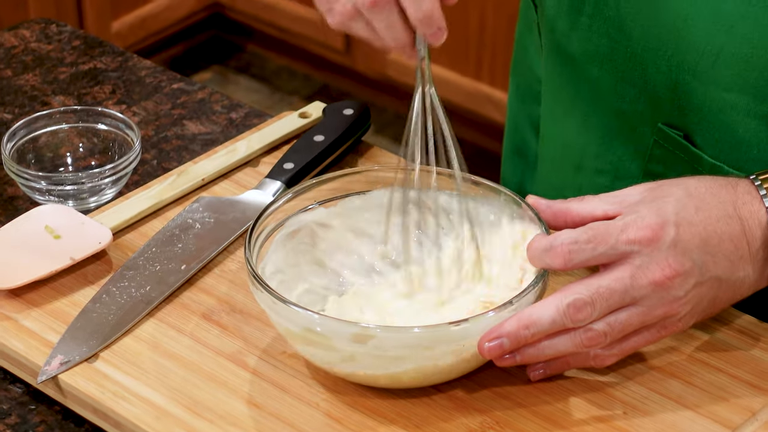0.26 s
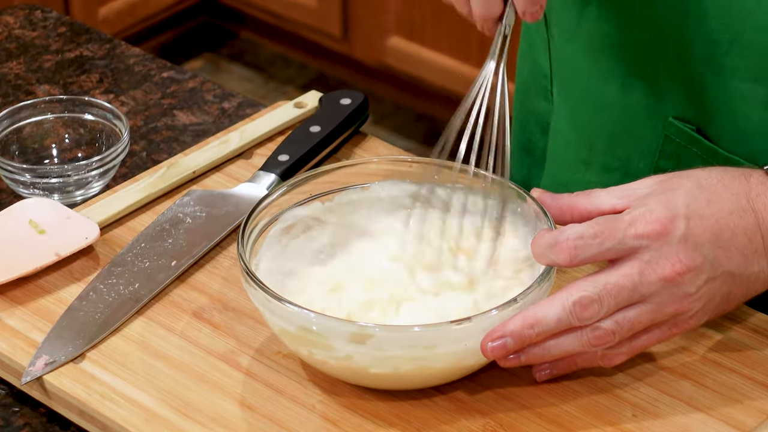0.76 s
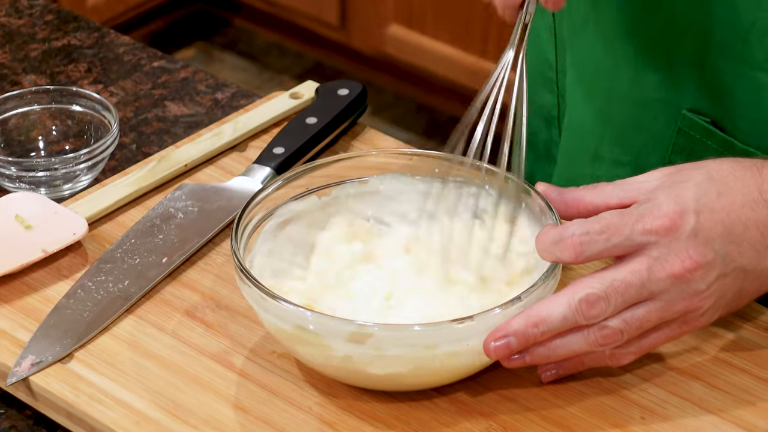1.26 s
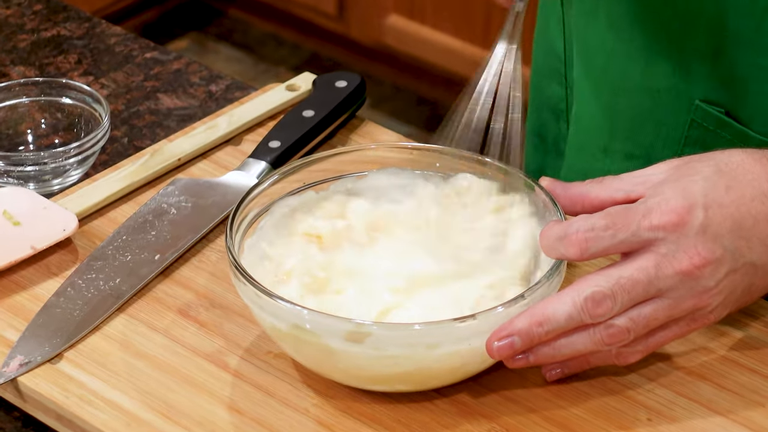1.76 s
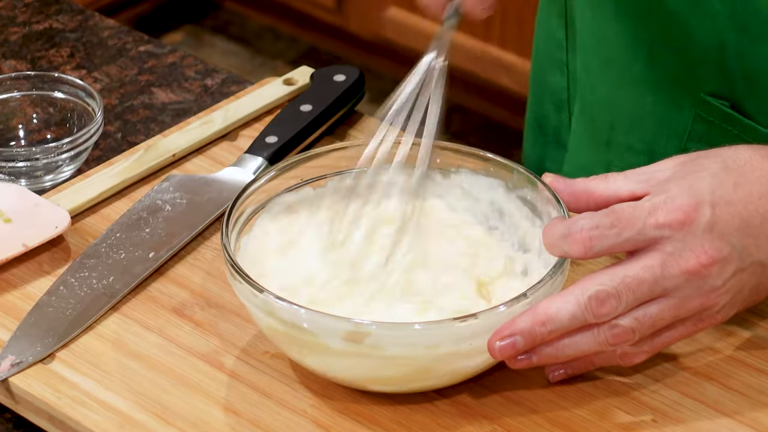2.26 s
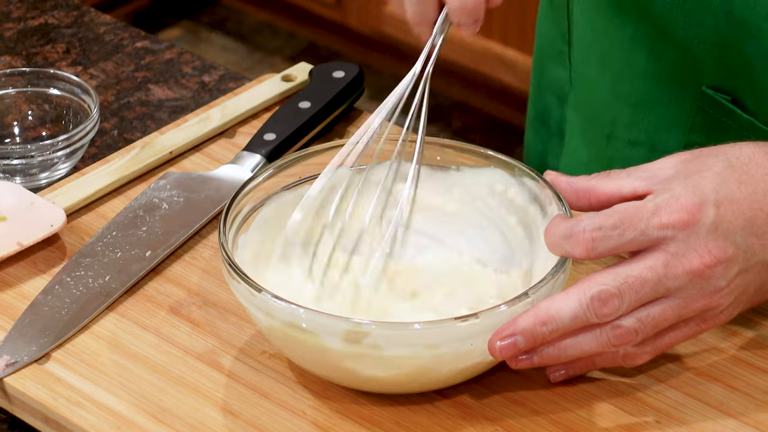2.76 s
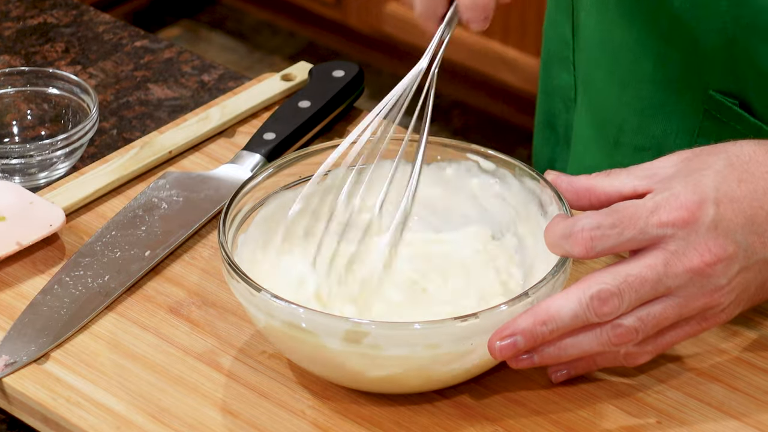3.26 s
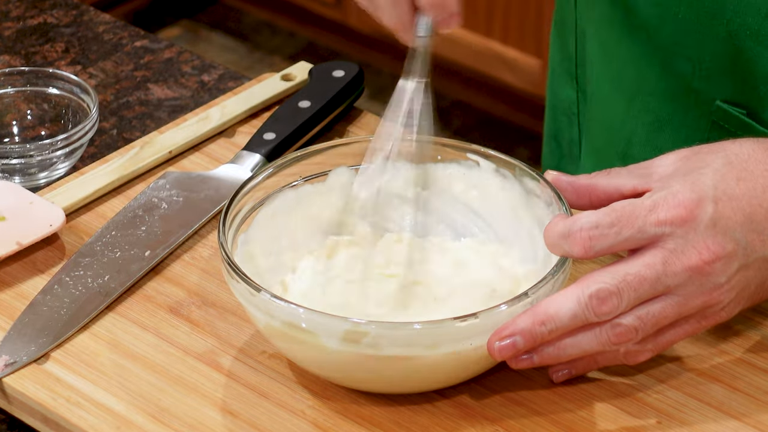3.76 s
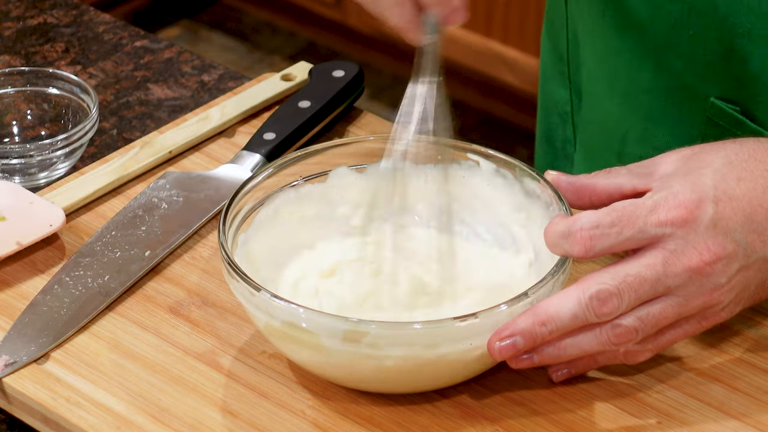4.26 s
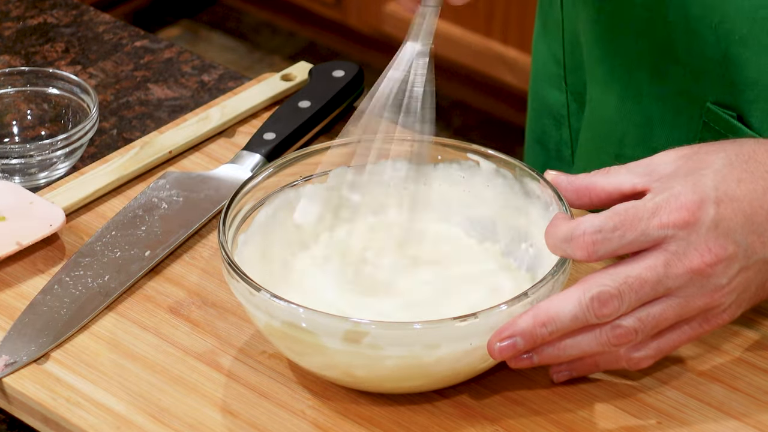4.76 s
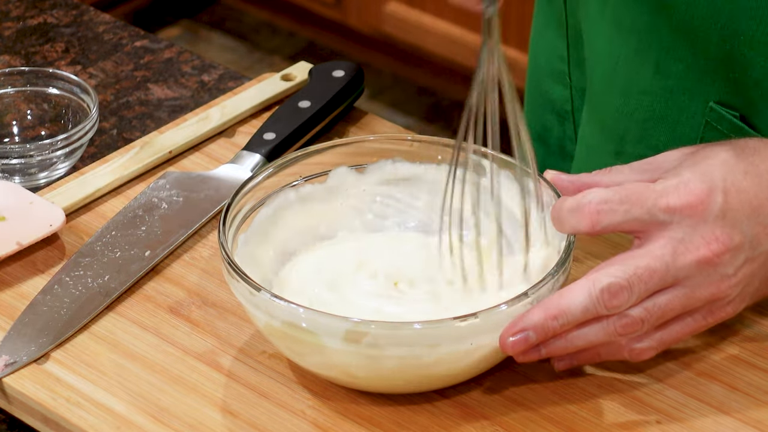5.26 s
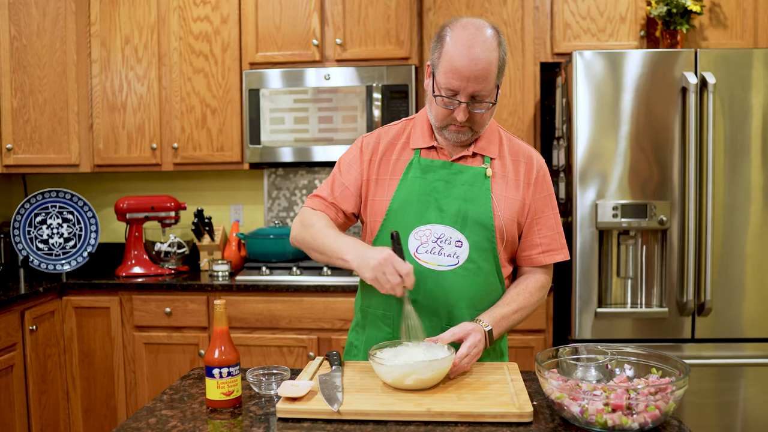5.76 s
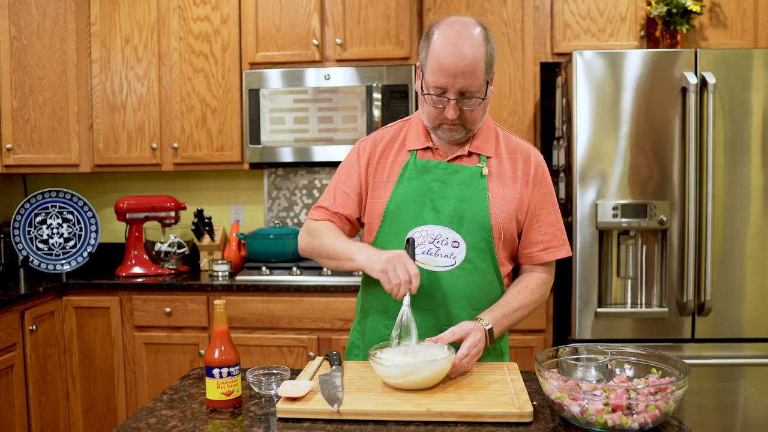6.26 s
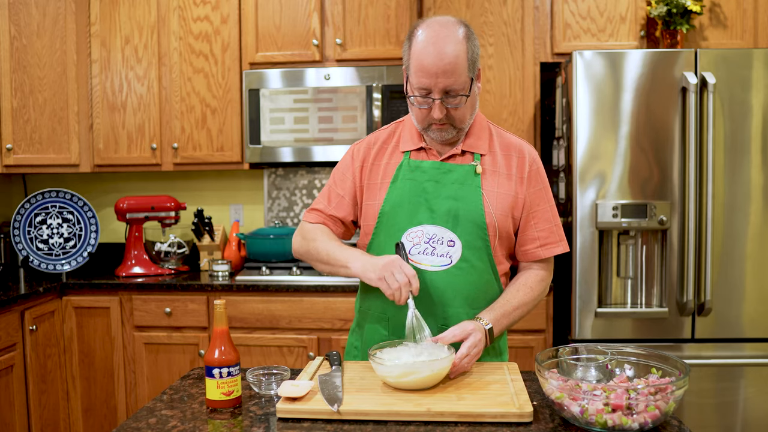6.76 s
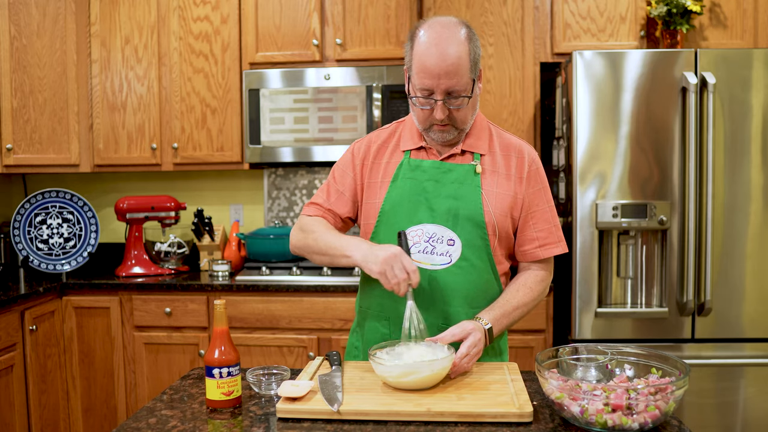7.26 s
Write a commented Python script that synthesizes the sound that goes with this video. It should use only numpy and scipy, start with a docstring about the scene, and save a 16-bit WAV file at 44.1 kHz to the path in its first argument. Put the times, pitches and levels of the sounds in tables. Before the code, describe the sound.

A wire whisk beats creamy sauce in a glass bowl, smooth wet scrapes giving way to rapid, rough clacking and bright steel clinks.

```python
"""A hand whisks sauce in a glass bowl on a wooden board: wires slap the sauce-damped glass and scrape on. The
first sweeps are smooth and stiff, with separate clacks built from modes of bowl, wires and board. From 1.5 to
2.8 s the sauce loosens: slips turn rougher, air pockets burst louder, light touches join in. Throughout, steel
clinks in hard blows and the glass hums in swells; from 3.5 s the hardest blows fling sauce as bright crackle.
The bowl thumps the board now and then, most firmly near 6 s; short echoes and a faint room tone surround all."""
import sys
import numpy as np
from scipy import signal
from scipy.fft import rfft, irfft
from scipy.io import wavfile
from scipy.ndimage import uniform_filter1d

SR = 44100
rng = np.random.default_rng(int(sys.argv[2]) if len(sys.argv) > 2 else 0)


def log_audio(samples):
    """Write samples as a 16-bit WAV file to the path given in sys.argv[1]."""
    # one column per channel
    frames = np.atleast_2d(samples).T
    # limit to full scale, then quantise
    limited = np.clip(frames, -1, 1)
    pcm = np.round(limited * 32767).astype(np.int16)
    wavfile.write(sys.argv[1], SR, pcm)


N = 332073
T = np.arange(N) / SR  # seconds
AGE = T[:SR // 4]  # seconds since a blow


def undb(db):
    """Decibels to gain."""
    return 10 ** (np.asarray(db) / 20)


def unit(x):
    """Scale to rms 1."""
    return x / np.sqrt(np.mean(x ** 2) + 1e-30)


def blow(x, db):
    """Set the rms level of a blow, taken over its first 1/40 s."""
    return x * undb(db) / np.sqrt(np.mean(x[:SR // 40] ** 2) + 1e-30)


def fade(t60):
    """Exponential decay that loses 60 dB in t60 seconds."""
    return np.exp(-np.log(1000) * AGE / t60)


def through(x, response):
    """Play x through an impulse response."""
    return signal.fftconvolve(x, response)[:len(x)]


def add(out, s, x):
    """Mix x into out at time s."""
    i = max(int(s * SR), 0)
    out[i:i + len(x)] += x[:max(N - i, 0)]


def above(x, hz):
    """Steep high-pass: small parts radiate no bass."""
    return signal.sosfilt(signal.butter(4, hz, "high", fs=SR, output="sos"), x)


def colour(x, points, size=4096):
    """Causal minimum-phase filter with the given (Hz, dB) shape."""
    hz, db = np.transpose(points)
    log_hz = np.log(np.fft.rfftfreq(size, 1 / SR) + 1)
    gain = undb(np.interp(log_hz, np.log(hz), db))
    # folding the cepstrum forward puts all the energy after the onset
    cepstrum = irfft(np.log(gain))[:size // 2]
    cepstrum[1:] *= 2
    return through(x, irfft(np.exp(rfft(cepstrum, size))))


def tinted(points, scatter_db):
    """A colour with every point moved by chance."""
    scatter = rng.standard_normal(len(points))
    return [(hz, db + scatter_db * size) for (hz, db), size in zip(points, scatter)]


def walk(rate):
    """Smooth chance with rms 1, steered by new random values at the given rate in Hz."""
    k = int(SR / rate)
    steps = np.repeat(rng.standard_normal(N // k + 1), k)[:N]
    return unit(uniform_filter1d(steps, k))


def ring(modes, scatter_db, detune, centres_hz=(), focus_db=0, span=.08):
    """Modes after one tap; the place of contact weights them by chance and favours those near the centres."""
    out = 0
    for (hz, db, t60), (size, shift, side) in zip(modes, rng.standard_normal((len(modes), 3))):
        focus = sum(focus_db * np.exp(-(np.log(hz / c) / span) ** 2) for c in centres_hz)
        gain = np.sign(side) * undb(db + scatter_db * size + focus)
        out = out + gain * fade(t60) * np.sin(2 * np.pi * hz * (1 + detune * shift) * AGE)
    return out


def chirp(hz, glide, t60):
    """A damped tone that starts off pitch by the share glide and settles as it dies."""
    return fade(t60) * np.sin(2 * np.pi * np.cumsum(hz * (1 + glide * fade(t60))) / SR)


def contacts(spread_s=.012, follow=.45, count=4):
    """The leading wire lands first and its neighbours clatter after it."""
    push = np.zeros(len(AGE))
    push[0] = 1
    late = (SR * spread_s * rng.uniform(.15, 1, count)).astype(int)
    push[late] = follow * rng.uniform(-0.68, 1, count)
    return push


def crack(t60, tail_db, tail_t60, snap=0):
    """The snap of one contact and its dense, quickly dying rattle."""
    out = rng.standard_normal(len(AGE)) * (fade(t60) + undb(tail_db) * fade(tail_t60))
    out[0] += snap
    return out


# Wires striking the bowl, levels before filter and mix. Each row: start in seconds, clack level in dB,
# bowl ring level in dB, ring centre in Hz, depth of contact from 0 (bare wall) to 1 (deep in the sauce).
STRIKES = [(.1379, -40, -38.5, 637, 0.36), (.1659, -39.5, -47, 800, 0.99), (.4513, -40, -48, 770, 0.83),
           (.72, -52, -61, 730, 0.66), (1.04, -55, -48, 700, 0.14), (1.0537, -42.5, -44, 740, 0.39),
           (1.1155, -43, -43.5, 665, 0.76), (1.3066, -50.5, -41.5, 750, 0.57),
           (1.348, -51, -45.5, 678, 0.53), (1.556, -47, -51, 700, 0.2), (1.6189, -58, -41, 658, 0.59),
           (1.8328, -41, -32.5, 671, 0.26), (1.8896, -42, -37, 720, 1), (1.988, -44, -44, 760, 0.12),
           (2.0987, -43, -39.5, 713, 0.14), (2.1817, -37.5, -34.5, 676, 1), (2.2491, -37, -32, 770, 0),
           (2.2528, -33, -32.5, 780, 0.88), (2.3008, -38, -59, 760, 0.77), (2.423, -52, -40, 695, 0.76),
           (2.4271, -35.5, -31, 650, 0.27), (2.4613, -47, -37, 653, 1), (2.5553, -42.5, -49, 746, 0.89),
           (2.5761, -41.5, -39, 786, 0.91), (2.649, -51.5, -51, 730, 0.51), (2.6803, -46, -40, 660, 0.14),
           (2.7264, -41, -36.5, 730, 0.99), (2.7695, -47, -32.5, 683, 1), (2.8011, -35.5, -32, 797, 1),
           (2.8265, -42, -53, 750, 0.92), (2.9098, -42.5, -36.5, 733, 0.27), (2.9317, -43.5, -42, 755, 0),
           (2.9562, -53, -67, 740, 0.042), (2.9815, -46, -37.5, 620, 0), (2.997, -43.5, -36.5, 675, 1),
           (3.0446, -43.5, -44.5, 644, 0.2), (3.1846, -43.5, -41, 733, 0.61), (3.2291, -49, -42, 740, 0),
           (3.2485, -36.5, -35.5, 725, 0.88), (3.3651, -47, -45, 714, 0.64), (3.479, -49, -40, 630, 0.094),
           (3.495, -50, -51, 694, 0.42), (3.5252, -35, -41, 760, 0.82), (3.5458, -35, -32, 818, 0),
           (3.5522, -32.5, -36, 734, 0.9), (3.5982, -42.5, -40, 787, 0.16), (3.628, -49, -58, 725, .6),
           (3.7595, -50, -44.5, 655, 0), (3.806, -32.5, -36.5, 784, 0.77), (3.8311, -29, -29.5, 737, 0.83),
           (3.8891, -38, -44, 760, 0.78), (3.915, -43, -41, 736, 0.55), (3.96, -46, -36.5, 760, 0.3),
           (4.023, -54, -56, 710, 0.2), (4.048, -44, -50, 700, 0.086), (4.0626, -35.5, -39, 760, 1),
           (4.0824, -37.5, -56, 755, 0.78), (4.1016, -33.5, -35.5, 783, 0.92),
           (4.133, -43.5, -53, 754, 0.38), (4.1646, -38.5, -36.5, 668, 0.71),
           (4.2929, -42, -39.5, 785, 0.024), (4.3282, -34.5, -41, 760, 0.93),
           (4.3485, -32.5, -37, 770, 0.93), (4.4082, -35, -41, 747, 0.86), (4.4992, -25, -19, 642, 0.25),
           (4.5447, -33.5, -33, 696, 0.91), (4.643, -55, -52, 720, 0.58), (4.705, -49, -54, 730, 0.76),
           (4.7368, -38, -27, 670, 0.21), (4.7402, -36.5, -36, 670, 0.31), (4.869, -38.5, -36.5, 670, 0.58),
           (4.922, -40.5, -35, 728, 0.32), (5.0039, -40, -41, 735, 0.64), (5.1257, -30.5, -31.5, 720, 0.73),
           (5.1469, -36.5, -54, 726, 0.3), (5.1584, -40, -41, 736, 0.31), (5.2207, -49.5, -51, 705, 0.45),
           (5.243, -47, -45.5, 693, 0.51), (5.294, -49.5, -46.5, 723, 0.33),
           (5.3383, -46.5, -53, 716, 0.045), (5.419, -47, -43, 760, 0.2), (5.433, -40.5, -35, 752, 0),
           (5.4742, -47.5, -49, 760, 0), (5.5213, -54, -41, 750, 0.03), (5.5775, -54.5, -53, 770, 0.056),
           (5.703, -62, -56, 760, 0.22), (5.7726, -33.5, -28.5, 666, 0.5), (5.826, -28.5, -33.5, 700, 0.69),
           (5.9544, -34, -35.5, 764, 0.19), (5.9595, -30, -39, 810, 0.96), (6.0471, -38, -46, 750, 0.78),
           (6.0649, -40, -44, 775, 0.26), (6.079, -42, -46, 713, 0.26), (6.1875, -33, -32.5, 680, 0.99),
           (6.2409, -32.5, -38, 720, 0.94), (6.2472, -30.5, -32, 795, 0.91), (6.373, -47, -48, 730, 0.5),
           (6.391, -52, -44, 685, 0.39), (6.425, -41.5, -35.5, 677, 0.82), (6.589, -49, -54, 750, 0.53),
           (6.775, -47.5, -48, 709, 0.63), (6.6212, -36, -29.5, 677, 0.25), (6.671, -34.5, -31, 649, 0.89),
           (6.8587, -24.5, -17, 662, 0.47), (6.8705, -34, -29.5, 723, 0.53),
           (7.0653, -27.5, -24, 700, 0.42), (7.1124, -38.5, -38.5, 722, 0.79),
           (7.2017, -24, -27, 711, 0.69), (7.2742, -35.5, -31, 782, 0.16), (7.282, -33, -29, 730, 0.27),
           (7.4036, -46.5, -39.5, 745, 0.4), (7.4246, -45, -42.5, 700, 0.11), (7.4935, -43, -34, 730, 0),
           (7.4997, -33.5, -28.5, 755, 0), (7.5088, -37.5, -30, 750, 0)]
# One wire, or the glass with the whisk lifted clear, left singing after a blow.
# Each row: start in seconds, pitch in Hz, level in dB before filter and mix, t60 in seconds.
PINGS = [(.01, 760, -57.5, 0.46), (.076, 1940, -61, 0.043), (.138, 2840, -46, 0.1), (.138, 5250, -67, 0.28),
         (4.329, 4540, -49, 0.087), (5.047, 1385, -42, 0.27), (5.22, 6700, -50, 0.035),
         (5.431, 785, -44, 0.98), (5.431, 5050, -47, 0.1), (5.432, 7400, -47.5, 0.16),
         (5.6, 773, -44.5, 0.34), (5.661, 1970, -50, 0.17), (6.866, 9800, -34, .06),
         (7.201, 5345, -30, 0.1)]
# Modes of the sounding parts: lowest of the glass bowl with sauce in it, its upper ones, whisk wires, board.
# Each row: nominal pitch in Hz, relative level in dB before chance, t60 in seconds before any extra choking.
WALL = [(638, -2, .1), (664, 0, .08), (694, -1, .09), (760, -1, .12), (802, -5, .1)]
GLASS = [(994, -5, .09), (1252, -5, .07), (1366, -1, .08), (1559, -1, .07), (1637, -2, .07),
         (1889, -3, .05), (2140, -4, .05), (2240, -2, .05), (2350, -5, .04), (3160, -11, .06)]
WIRES = [(3160, -9, .05), (3475, -7, .05), (3900, -8, .03), (4345, -1.5, .05), (4530, -2, .04),
         (5337, -3, .06), (5725, -2, .04), (6020, -4, .03), (6595, -3, .04), (7435, -5, .06),
         (7925, -7, .04), (9790, -14, .03)]
BOARD = [(356, -6.5, 0.096), (408, 3, 0.1), (510, 7, 0.057)]
# Colours of the clack's crack and of the bright tick. Each row: frequency in Hz, gain in dB before chance.
CLACK = [(500, -34), (900, -6.5), (1200, -1), (2200, 2), (2600, -2), (3500, -6), (6000, -40.5)]
TICK = [(1800, -30), (3000, 6), (4500, 15), (8000, 8.5), (11000, 10), (13500, -2), (16000, -29)]
# Pairs run from a contact on the bare wall to one deep in the sauce; tick and knock are relative to the clack.
CLACK_HZ, ONSET_S = (2211, 1326), (0.0039, 0.0085)  # favoured pitch; sauce cushions the onset
TICK_DB, KNOCK_DB = (0.5, -7.5), (-28.5, -11)
KNOCK_FROM_DB, KNOCK_GROWTH = -36.5, 0.59  # under this clack level the knock loses these extra dB per dB
TICK_SCATTER_DB, CLACK_SCATTER_DB = 1, 2  # every contact colours its tick and clack differently


def strikes():
    """Every blow sounds the bowl's lowest modes, its clacking upper modes, the wires and the board."""
    out = np.zeros(N)
    for s, clack_db, ring_db, ring_hz, depth in STRIKES + grazes():
        clack_hz, onset_s = np.interp(depth, (0, 1), CLACK_HZ), np.interp(depth, (0, 1), ONSET_S)
        tick_db, knock_db = np.interp(depth, (0, 1), TICK_DB), np.interp(depth, (0, 1), KNOCK_DB)
        knock_db += KNOCK_GROWTH * min(clack_db - KNOCK_FROM_DB, 0)
        onset = 1 - fade(onset_s)
        push = contacts(spread_s=0.013, follow=0.47)
        # the heavy wall takes a few cycles to get going; sauce and wires choke its first swing
        wall = ring(WALL, 0.87, 0.014, [ring_hz], focus_db=13.0, span=0.04)
        wall = wall * (1 - fade(0.027)) * (fade(0.22) + 0.51)
        glass = blow(ring(GLASS, 9.6, 0.0078, [clack_hz], focus_db=9.5, span=0.12), 0)
        # a pocket of air pops open in the sauce behind the wires
        pocket = blow(chirp(clack_hz, 0.015, 0.027), -0.95)
        rattle = colour(crack(0.016, -15.5, 0.14, snap=4.0), tinted(CLACK, CLACK_SCATTER_DB))
        clack = through(glass + pocket + blow(rattle, -0.63), push) * onset
        # wires ring at their own pitches, and at stray ones where the glass stops them short
        own = blow(ring(WIRES, 0.56, 0.0047), -7.5)
        stray = blow(ring(WIRES, 11.4, 0.27) * fade(0.044), -6.0)
        snap = blow(colour(crack(0.01, -23, 0.18, snap=8.8), tinted(TICK, TICK_SCATTER_DB)), 0)
        tick = through(snap + own + stray, contacts(spread_s=0.017, follow=0.19)) * onset
        knock = ring(BOARD, 14.0, 0.029) * (1 - fade(0.0088))
        hit = blow(clack, 0.87) + blow(tick, tick_db) + blow(knock, knock_db)
        add(out, s, blow(wall, ring_db) + undb(clack_db) * hit)
    for s, hz, db, t60 in PINGS:
        add(out, s, blow(chirp(hz, 0, t60) * (1 - fade(0.016)), db))
    return above(out, 283)


WHISKING_S = (1.5, 7.5)  # span of the light touches
GRAZE_DB, GRAZE_RING_DB = -3.5, 3.5  # firmest touch, relative to the shearing: clack, bowl ring
GRAZE_RANGE_DB = 7  # the lightest touches are this much softer


def grazes(count=28):
    """Light chance touches of the wires, firmer when the whisk churns harder, as rows like those of STRIKES."""
    times, shear_db, _ = np.transpose(CHURN)
    rows = []
    for k, (when, size, place, depth) in enumerate(rng.random((count, 4))):
        s = np.interp((k + when) / count, (0, 1), WHISKING_S)
        db = np.interp(s, times, shear_db) - GRAZE_RANGE_DB * size
        ring_hz = np.interp(place, (0, 1), (WALL[0][0], WALL[-1][0]))
        rows.append((s, GRAZE_DB + db, GRAZE_RING_DB + db, ring_hz, depth))
    return rows


# Wires clinking against each other in the hardest blows.
# Each row: start in seconds, level in dB before the mix, centre of the brightest modes in Hz.
CLINKS = [(.137, -64, 9050), (2.248, -46, 10900), (2.427, -54, 10700), (2.801, -37, 10200),
          (3.552, -29, 11950), (3.83, -37, 11500), (3.844, -39, 10800), (3.8895, -31.5, 10800),
          (4.1, -37.5, 10900), (4.408, -42, 10600), (4.498, -38, 11600), (4.506, -29, 11100),
          (4.5437, -33, 11740), (4.737, -42, 11500), (5.126, -35, 11800), (5.1464, -42, 13100),
          (5.158, -41, 11900), (5.7725, -52, 10300), (6.245, -35, 11400), (6.8582, -34, 9500),
          (6.865, -25, 12200), (6.872, -36, 12500), (7.066, -49, 10000), (7.2036, -25.5, 11040),
          (7.282, -29, 9050)]


def clinks(count=9):
    """Steel meets steel: a hard snap and a cluster of high, quickly choked wire modes."""
    out = np.zeros(N)
    for s, db, hz in CLINKS:
        bright = [(hz / 3, -24), (0.56 * hz, -4), (hz, 0), (16000, -7)]
        snap = colour(crack(0.0099, -25, .08, snap=2.4), bright)
        steel = ring([(hz, 0, .025)] * count, 5.8, 0.17)
        add(out, s, blow(blow(snap, 0) + blow(steel, 1), db))
    return out


# Sweeps of the wires along the glass. Each row: start in seconds, scrape level in dB before bite, sag and mix,
# length in seconds until the wires let go, starting level of the wet hiss in dB relative to the scrape.
STROKES = [(0.154, -52, 0.061, -27), (0.264, -56, 0.086, 1), (0.329, -37, 0.11, -10),
           (0.434, -49.5, 0.23, 0.5), (0.599, -39, 0.16, -19), (0.843, -36.5, 0.18, -13.5),
           (1.118, -35, 0.11, -11.5), (1.359, -36.5, 0.17, -13.5), (1.643, -36, 0.16, -10),
           (1.913, -38, 0.17, -10), (2.207, -40, 0.54, -11), (2.5, -39.5, 0.081, -10),
           (2.753, -41, 0.22, -0.5), (3.021, -38.5, 0.088, -9), (3.25, -37, 0.097, -7),
           (3.521, -33.5, 0.017, -7), (3.8, -30, 0.042, -11), (3.86, -43, .06, -11), (4.05, -39, 0.14, -22),
           (4.236, -62, 0.17, -22), (4.45, -44, 0.066, -22), (4.566, -34, 0.048, -7.5),
           (4.783, -34.5, 0.059, -7), (5.029, -41.5, 0.13, -20), (5.156, -44, 0.034, -20),
           (5.417, -46, 0.03, 1), (5.815, -42.5, 0.032, 3.5), (5.967, -41.5, 0.21, -15),
           (6.212, -31.5, 0.026, -12), (6.265, -46, .12, -21), (6.459, -36, 0.067, -7),
           (6.697, -33.5, 0.046, -8.5), (6.798, -36.5, 0.1, -9), (6.913, -32, 0.061, -4.5),
           (7.003, -39.5, 0.089, -17), (7.133, -33, 0.057, -10), (7.208, -37, 0.1, -3),
           (7.378, -40, 0.018, -21)]
# Between sweeps the whisk keeps churning; levels glide from row to row.
# Each row: time in seconds, shearing of the sauce in dB before lumps and mix, ring of the bowl in dB before mix.
CHURN = [(0, -59.5, -55.5), (.11, -71.5, -64), (.17, -50.5, -52), (.3, -53.5, -49), (.55, -55.5, -40.5),
         (.8, -53.5, -47), (1.25, -49, -46.5), (2.15, -52.5, -45.5), (2.95, -46.5, -39), (3.15, -49, -52),
         (3.74, -49, -48.5), (4.0, -45, -39.5), (4.4, -45, -54), (4.53, -43.5, -48), (4.85, -46, -46),
         (5.08, -58, -57), (5.36, -54.5, -47), (5.52, -53.5, -49), (5.75, -53.5, -52), (5.9, -46, -41),
         (7.5, -50.5, -51)]
LOOSENS_S = (1.5, 2.8)  # the sauce loosens over this time; the pairs below are (stiff sauce, loose sauce)
BITE_S, SAG_DB_PER_S = (0.048, 0.019), (62, 58)  # a sweep bites, then loses speed
RELEASE_S = 0.016  # time constant of the wires leaving the wall
HISS_SAG_DB_PER_S = 25  # the wet hiss fades faster than the scrape by this much
LUMPS_DB = 1.23  # rms spread of the shearing level
CHURN_HISS_DB, STROKE_RING_DB = -19.5, -12  # hiss relative to shearing (at HISS_FROM_DB); ring to sweep
HISS_FROM_DB, HISS_GROWTH = -50, 0.88  # around this shearing level the hiss gains these extra dB per dB


def effort():
    """Gains of scrape, hiss and bowl ring: every sweep swells by the same rule over the steady churning."""
    s, shear_db, ring_db = np.transpose(CHURN)
    shear_db = np.interp(T, s, shear_db)
    # lumps of sauce make the shearing come and go
    shear = undb(shear_db + LUMPS_DB * walk(14))
    bowl = undb(np.interp(T, s, ring_db))
    churn_hiss = shear * undb(CHURN_HISS_DB + HISS_GROWTH * (shear_db - HISS_FROM_DB))
    sweeps, wet = np.zeros(N), np.zeros(N)
    age = T[:SR // 2]
    for start, db, length, hiss_db in STROKES:
        bite_s = np.interp(start, LOOSENS_S, BITE_S)
        sag = np.interp(start, LOOSENS_S, SAG_DB_PER_S)
        bite = np.sin(np.pi / 2 * np.minimum(age / bite_s, 1)) ** 2
        release = np.exp(-np.maximum(age - length, 0) / RELEASE_S)
        swell = bite * undb(db - sag * age) * release
        add(sweeps, start, swell)
        add(wet, start, swell * undb(hiss_db - HISS_SAG_DB_PER_S * age))
    return np.hypot(sweeps, shear), np.hypot(wet, churn_hiss), np.hypot(undb(STROKE_RING_DB) * sweeps, bowl)


def friction(rate, spread_db, smooth):
    """Tiny slips of very unequal size over the smooth shearing of the sauce."""
    sizes = undb(spread_db * np.minimum(rng.exponential(size=N), 4))
    slips = (rng.random(N) < rate / SR) * rng.standard_normal(N) * sizes
    return (unit(slips) + smooth * rng.standard_normal(N)) / np.hypot(1, smooth)


def squeaks(modes, scatter, count):
    """Modes sing for a moment as each wire bears on the wall, at a pitch set by the place of contact."""
    out = np.zeros(N)
    for when, which, length, place, size, phase in rng.random((count, 6)):
        hz, db, _ = modes[int(which * len(modes))]
        u = np.linspace(0, 1, int(SR * .02 * (1 + length)))
        pitch = hz * (1 + scatter * (place - .5)) * (1 - .012 * u)
        tone = np.sin(2 * np.pi * (phase + np.cumsum(pitch) / SR))
        add(out, when * T[-1], undb(db - 25 * size) * np.sin(np.pi * u) * tone)
    return unit(out)


def wire_grain(slips, t60=0.045, count=24):
    """Slips ring the many fine modes of whichever wires are dragging; the set changes as the whisk turns."""
    out = np.zeros(N)
    step = N // count
    for k in range(count + 1):
        start, stop = max(k - 1, 0) * step, min((k + 1) * step, N)
        # neighbouring sets crossfade at equal power
        share = np.sqrt(np.maximum(1 - np.abs(np.arange(start, stop) / step - k), 0))
        body = rng.standard_normal(len(AGE)) * fade(t60)
        add(out, start / SR, signal.fftconvolve(slips[start:stop] * share, body / np.linalg.norm(body)))
    return out


# Colours of the rubbing: scrape, wires cutting through the sauce with humps where their modes crowd,
# wet hiss, and the band where the rubbed bowl hums. Each row: frequency in Hz, gain in dB before levelling.
SCRAPE = [(320, -51.5), (520, 4), (760, 1), (890, -15), (1050, 11.5), (1200, 6.5), (1550, 11.5),
          (1850, 3.5), (2250, 14.5), (2650, 0), (4400, -9.5), (6200, -14), (8000, -25), (11000, -55)]
SWISH = [(2000, -29), (2700, -10), (3170, 1.5), (3830, -8.5), (4390, 1.5), (4990, -11.5), (5650, -4),
         (6240, -13), (6760, -2.5), (7400, -16.5), (8890, -12.5), (9700, -34)]
HISS = [(4500, -23), (7000, 8), (8890, 5), (9600, -1), (11000, 7), (12500, -3.5), (14000, -57)]
WALL_BAND = [(500, -27), (620, 1.5), (805, 5), (890, -23.5)]
SMOOTHNESS = (2, 0.98)  # smooth shearing against slips: (stiff sauce, loose sauce)
WIRE_RING_DB = -0.5  # steady ring of the rubbed wires, relative to their squeaks
SWISH_DB = -6.5  # against the drag
SLOSH = 0.017  # rms share by which the moving sauce detunes the wall


def scraping(drag, wet, sing):
    """Dragged wires hiss through the sauce, squeak and keep the glass ringing."""
    # the rubbing is smooth in the stiff sauce and turns rougher as it loosens
    rough_db = np.interp(T, LOOSENS_S, [1.3, 2.4])
    slips = friction(rate=1600, spread_db=4.5, smooth=np.interp(T, LOOSENS_S, SMOOTHNESS))
    slips = slips * undb(rough_db * walk(80))
    glass = unit(through(slips, ring(GLASS, 0.75, 0.00054)))
    glass = unit(glass + 3.8 * squeaks(GLASS, scatter=0.052, count=1600))
    wire_colour = [(3000, -0.5), (5900, 5.5), (8000, -7), (10000, -6)]
    wires = unit(colour(squeaks(WIRES, scatter=0.1, count=2200), wire_colour))
    wire_ring = unit(through(slips, ring(WIRES, 0.45, 0.0023) * fade(0.057)))
    wires = unit(wires + undb(WIRE_RING_DB) * wire_ring)
    # a firmer stroke brings out the wires' squeak over the wet rustle
    squeak = undb(np.clip(-6.5 + 0.98 * (20 * np.log10(drag) + 42), -14, 4))
    rustle = unit(colour(wire_grain(slips, t60=0.013, count=40), SCRAPE))
    scrape = (unit(rustle + undb(-3.5) * glass) + squeak * wires) / np.hypot(1, squeak)
    # the wires cut through the sauce with a grainy swish
    swish = undb(SWISH_DB) * unit(colour(wire_grain(slips, t60=0.012, count=26), SWISH))
    hiss = unit(colour(wire_grain(slips), HISS))
    wall = 0
    for hz, db, t60 in WALL:
        level = undb(db + 5.6 * walk(16))
        wall = wall + level * unit(through(friction(900, 3.6, 0.49), chirp(hz, 0, 2.3 * t60)))
    wall = unit(wall)
    # reading the hum early and late bends its pitch
    wall = np.interp(T + np.cumsum(SLOSH * walk(9)) / SR, T, wall, period=T[-1])
    hum = undb(-9.5) * sing * colour(wall, WALL_BAND)
    return above(drag * (undb(-1.2) * scrape + swish) + undb(-0.3) * wet * hiss + hum, 400)


SQUELCH_DB = (-17.5, -4.5)  # largest bursts against the capped drag, before the mix: (stiff, loose sauce)


def squelch(drag, count=220):
    """Small air pockets burst in the churned sauce, louder with a harder drag up to a cap."""
    out = np.zeros(N)
    drag_db = 20 * np.log10(drag)
    for when, pitch, size in rng.random((count, 3)):
        bubble = blow(chirp(1100 * 2 ** (1.3 * pitch), -0.012, 0.034), -0.28)
        spit = blow(colour(crack(0.016, -11, 0.024), TICK) * (1 - fade(0.0096)), -2.0)
        # the sauce spits more once it has loosened
        loose_db = np.interp(when * T[-1], LOOSENS_S, SQUELCH_DB)
        level_db = min(drag_db[int(when * N)], -43) + loose_db - 10 * size
        add(out, when * T[-1], blow(bubble + spit, level_db))
    return above(out, 670)


# Sauce flung off the wires. Each row: start in seconds, level in dB before the mix, t60 in seconds.
SPATTER = [(3.556, -50, 0.099), (3.835, -49.5, 0.18), (4.508, -43, 0.11), (5.15, -42.5, 0.078),
           (6.246, -50.5, 0.21), (6.872, -44, 0.12), (7.073, -45, 0.16), (7.212, -45, 0.11)]


def spatter():
    """The hardest blows fling sauce off the wires in a short, bright crackle."""
    flung = np.zeros(N)
    for s, db, t60 in SPATTER:
        add(flung, s, blow(fade(t60) * (1 - fade(0.0059)), db))
    drops = friction(rate=1100, spread_db=-0.5, smooth=0.63)
    crackle = colour(drops, [(11000, 10.0), (14000, 3.0), (16000, -12)])
    return flung * unit(above(crackle, 8300))


# Sauce shoved against the glass, making it hum briefly.
# Each row: top of the swell in seconds, peak level in dB before the mix, pitch at the top in Hz.
SHOVES = [(.382, -46, 780), (.556, -47, 701), (.638, -45, 712), (.901, -39.5, 692), (1.195, -46, 662),
          (1.469, -48, 761), (1.693, -40.5, 662), (3.293, -42, 694), (3.417, -43, 721), (4.042, -42, 705),
          (4.795, -33.5, 675), (4.976, -41, 668), (5.252, -47, 695), (5.455, -44, 805), (5.634, -37, 771),
          (5.903, -40, 676), (6.132, -40.5, 703), (6.293, -46, 778), (6.393, -46, 697), (6.459, -35, 685),
          (6.49, -42, 664), (6.969, -35, 752)]
SHOVE_S, SHOVE_GLIDE = .05, 0.07  # length; share by which the pitch rises as the sauce slides off


def shoves():
    """Each wave of sauce loads the wall differently, so the bowl hums at a pitch of its own."""
    out = np.zeros(N)
    u = np.linspace(0, 1, int(SR * SHOVE_S))
    swell = np.sin(np.pi * u) ** 2
    for s, db, hz in SHOVES:
        pitch = hz * (1 + SHOVE_GLIDE * (u - .5))
        add(out, s - SHOVE_S / 2, undb(db) * swell * np.sin(2 * np.pi * np.cumsum(pitch) / SR))
    return out


# The bowl rocking down on the board. Each row: start in seconds, thump level in dB before the high-pass,
# pitch it settles towards in Hz, level of the rumble after it in dB before its build-up and decay.
THUMPS = [(0.17, -73, 99, -64), (0.59, -64, 134, -71), (1.467, -73, 84, -76), (1.84, -78, 80, -72),
          (2.27, -68, 86, -73), (2.479, -63, 121, -87), (2.767, -53, 147, -53.5), (2.801, -44.5, 138, -55),
          (3.867, -52, 89, -64), (3.885, -47.5, 75.4, -58), (4.12, -68, 84, -76), (4.548, -55, 95, -59.5),
          (5.648, -71.5, 172, -67), (6.049, -31.5, 158, -65), (6.055, -29, 77.4, -68),
          (6.191, -46, 104, -45.5), (6.252, -46.5, 167, -63), (7.063, -36, 83.6, -47.5),
          (7.202, -51, 111, -85)]
# Hand and wood soften a thump; the rocking rumbles. Each row: frequency in Hz, gain in dB before levelling.
CUSHION = [(170, -0.5), (260, 2), (450, -34)]
RUMBLE = [(20, -69), (45, 19), (80, 21.5), (160, 11), (250, 6), (500, 18), (1500, -81)]
ROCKING_S, ROCKING_RISE_S = 0.14, 0.029  # time constants of the rumble: dying away, building up


def board():
    """The bowl thumps softly on the board, sagging in pitch as the weight settles, and rumbles as it rocks."""
    out, rocking = np.zeros(N), np.zeros(N)
    age = T[:SR]
    for s, db, hz, rumble_db in THUMPS:
        thud = (chirp(hz, 0.4, 0.085) + 0.61 * chirp(2 * hz, 0.017, 0.026)) * (1 - fade(0.012))
        thud = through(thud, contacts(spread_s=0.023, follow=0.12))
        add(out, s, blow(colour(thud, CUSHION), db))
        build = 1 - np.exp(-age / ROCKING_RISE_S)
        add(rocking, s, undb(rumble_db) * np.exp(-age / ROCKING_S) * build)
    rocking = rocking * undb(2 * walk(24))  # the bowl shifts in small jerks
    rumble = colour(rng.standard_normal(N) * rocking, RUMBLE)
    rumble = rumble / np.std(colour(rng.standard_normal(N), RUMBLE))  # level of the plain coloured noise
    return above(out + rumble, 48)


def kitchen(x, early_db=-11, late_db=-17, t60=0.33, count=10):
    """Quick reflections from board, counter and body, then a faint tail from the cupboards."""
    early = np.zeros(len(AGE))
    early[(SR * rng.uniform(.001, .009, count)).astype(int)] = rng.standard_normal(count)
    tail_colour = [(100, -8), (700, 2.3), (2000, 2.0), (5000, -4.5), (14000, -5.0)]
    late = colour(rng.standard_normal(len(AGE)), tail_colour) * fade(t60) * (1 - fade(0.27))
    early = undb(early_db) * early / np.linalg.norm(early)
    late = undb(late_db) * late / np.linalg.norm(late)
    return x + through(x, early + late)


# Colour of the quiet room. Each row: frequency in Hz, gain in dB before levelling.
ROOM_TONE = [(20, -23), (80, -14), (250, -22), (700, -63), (3000, -25.5), (14000, -49)]


def room_tone():
    """Steady coloured noise, faint under everything."""
    return undb(-83.5) * unit(colour(rng.standard_normal(N), ROOM_TONE))


def scene():
    """Whisk, sauce, bowl and board in a quiet kitchen."""
    drag, wet, sing = effort()
    whisking = undb(-2.0) * strikes() + undb(-7.0) * clinks()
    whisking += undb(-3.0) * scraping(drag, wet, sing)
    whisking += undb(3.5) * squelch(drag) + undb(7.0) * spatter()
    whisking += undb(-1.0) * shoves() + board()
    return (kitchen(whisking, early_db=-18.5) + room_tone())[None]


TOP_HZ = 16000  # edge of the treble


def record(dry):
    """A steep elliptic low-pass cuts the top."""
    return signal.sosfilt(signal.ellip(8, .2, 70, TOP_HZ, fs=SR, output="sos"), dry)


dry = scene()
out = record(dry)
log_audio(out)
```